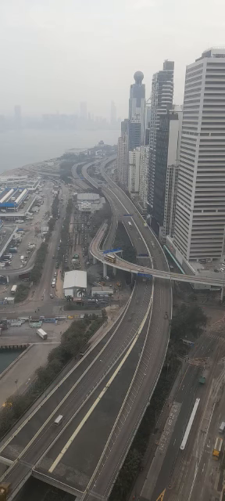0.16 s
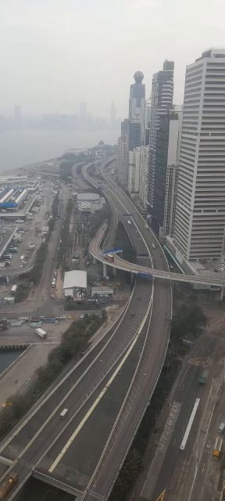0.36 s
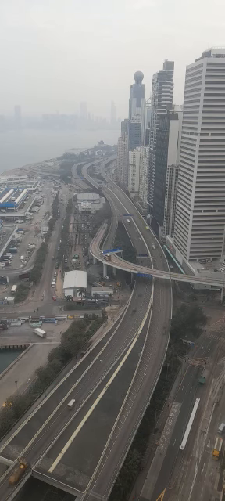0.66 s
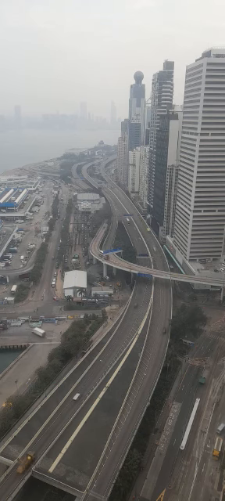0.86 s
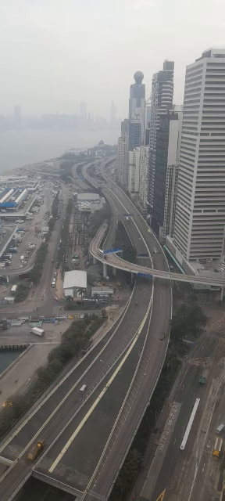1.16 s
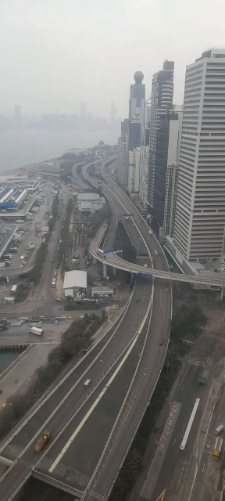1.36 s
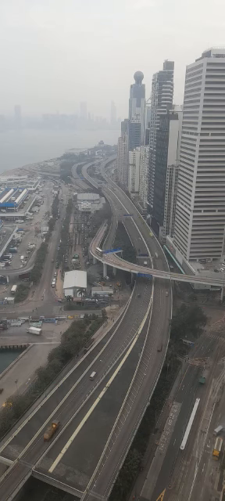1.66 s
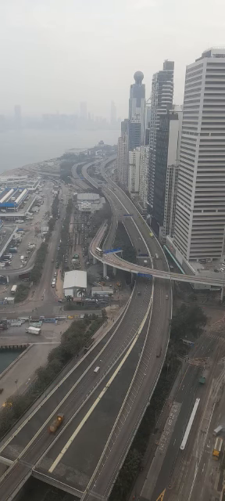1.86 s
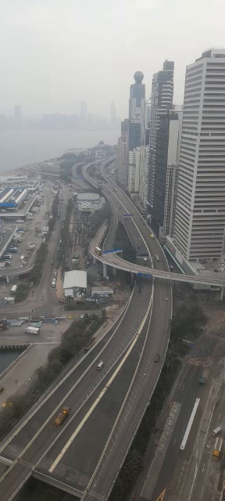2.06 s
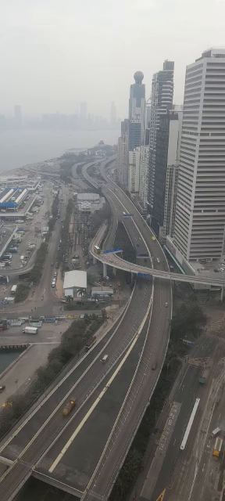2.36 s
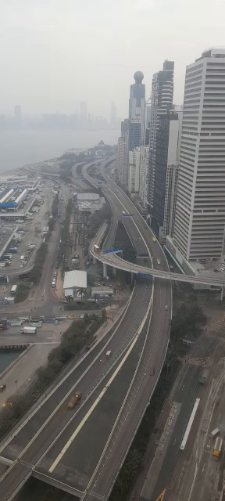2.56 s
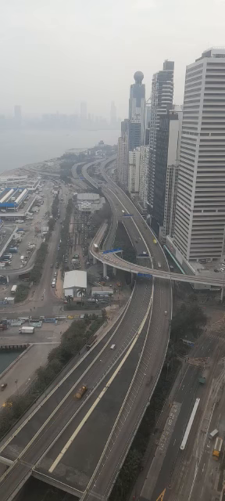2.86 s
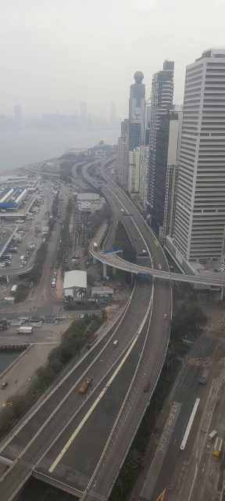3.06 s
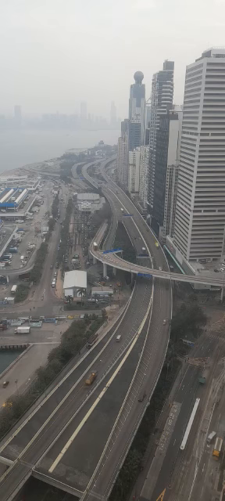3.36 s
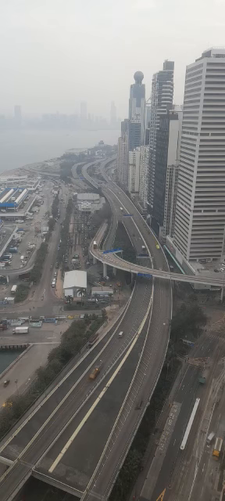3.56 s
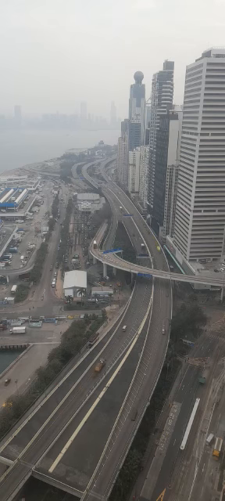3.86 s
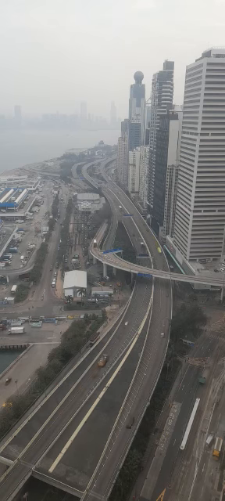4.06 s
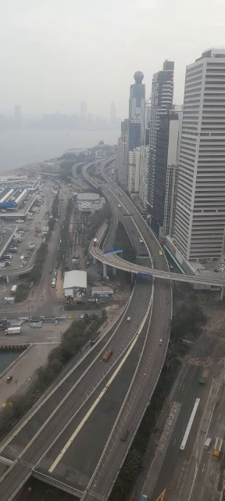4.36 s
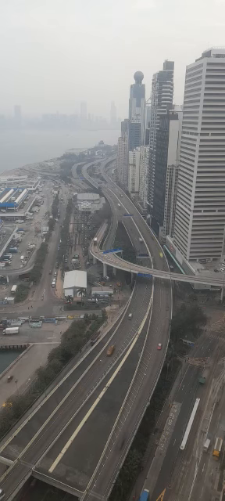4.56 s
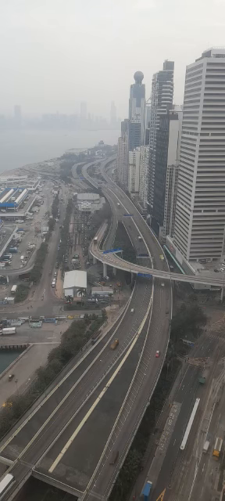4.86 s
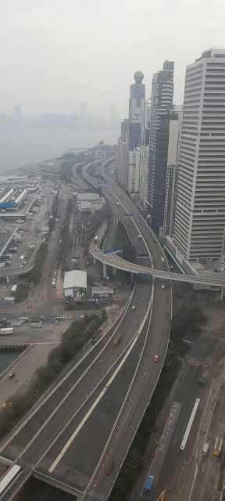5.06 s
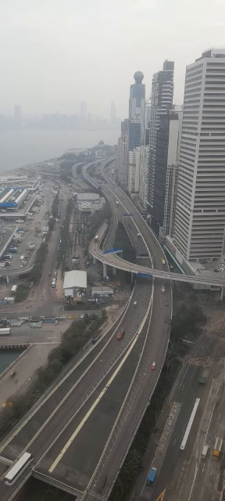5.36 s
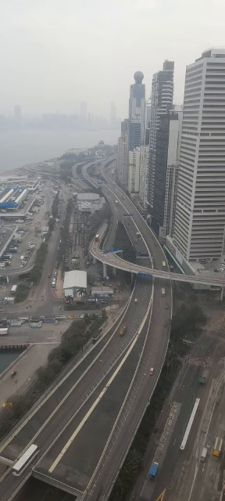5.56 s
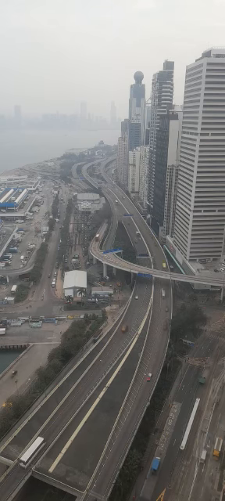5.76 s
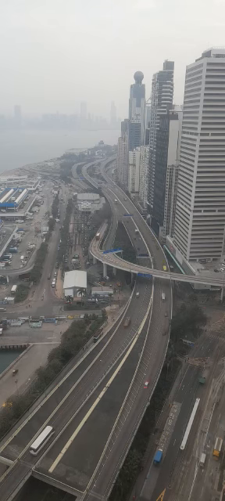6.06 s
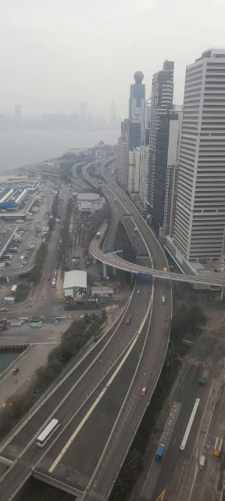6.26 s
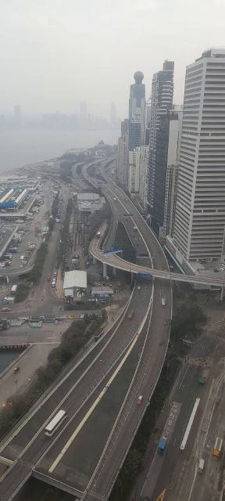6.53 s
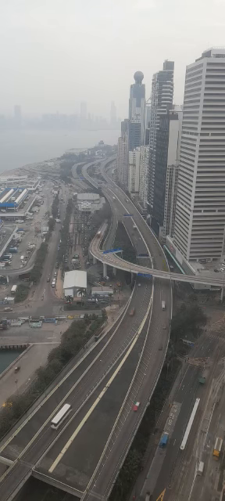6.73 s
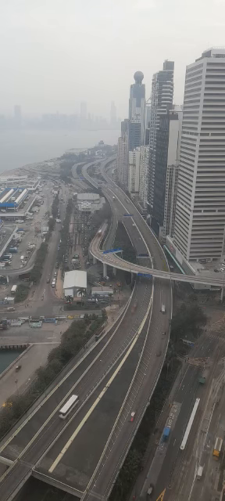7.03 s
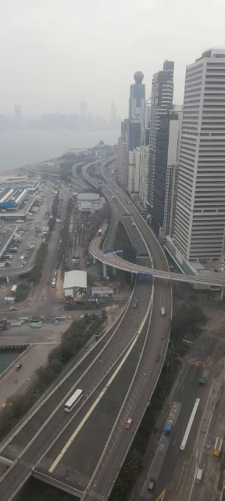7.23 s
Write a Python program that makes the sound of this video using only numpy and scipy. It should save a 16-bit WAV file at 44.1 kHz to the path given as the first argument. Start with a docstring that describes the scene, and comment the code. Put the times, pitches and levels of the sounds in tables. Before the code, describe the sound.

Heard from high in a tower, a low merged engine rumble and soft tyre roar rise from an elevated highway far below. Thin fluttering air hisses through a window gap close to the stereo microphones, slowly weakening. An engine revs briefly at the start, then a soft low bump and a faint brush. Tiny brake squeals and whines come and go; late on, a bus and lorries pull away with rising pitch.

```python
"""A low traffic rumble runs throughout, with a soft tyre roar, heard high up in a tower far above an elevated highway.
Close to the microphones air hisses thinly through a window gap: noise in narrow, fluttering resonances.
Engines are wavering tones with an octave above; late on, heavy vehicles pull away with rising pitch.
Faint whines and brake squeals are narrow wavering tones; a soft low bump, a faint brush and
the brighter hiss of single passing vehicles are shaped bands of noise."""
import sys
import numpy as np
from scipy import signal
from scipy.fft import rfft, irfft, next_fast_len
from scipy.io import wavfile

SR = 44100
rng = np.random.default_rng(int(sys.argv[2]) if len(sys.argv) > 2 else 0)


def store_wav(level_fs):
    """Save 16-bit WAV to argv[1]."""
    pcm = np.round(np.clip(np.atleast_2d(level_fs), -1, 1) * 32767)
    wavfile.write(sys.argv[1], SR, pcm.T.astype(np.int16))


N = 325899
TIME = np.arange(N) / SR  # seconds
FFT_SIZE = next_fast_len(N, True)
FREQ = np.maximum(np.arange(FFT_SIZE // 2 + 1) * SR / FFT_SIZE, 1)  # Hz, kept above 0 for the logarithm


def from_db(db):
    """Decibels to gain."""
    return 10 ** (np.asarray(db) / 20)


def rms_one(x):
    """Scale to unit power."""
    return x / np.sqrt(np.mean(np.abs(x) ** 2))


def in_time(rows):
    """Each column of a curve at every sample; the end rows hold outside the curve."""
    seconds, *columns = np.transpose(rows)
    return [np.interp(TIME, seconds, column) for column in columns]


def at_hz(points, hz):
    """Read a spectrum on a log-frequency axis."""
    known_hz, values = np.transpose(points)
    return np.interp(np.log(hz), np.log(known_hz), values)


def swell(middle, length):
    """A smooth rise to 1 and fall back to 0; both times in seconds."""
    return np.cos(np.pi * np.clip((TIME - middle) / length, -.5, .5))


def drift(rate):
    """Smooth chance of spread 1 that changes about rate times a second."""
    step = 40  # samples between slow values
    pole = np.exp(-2 * np.pi * rate * step / SR)
    chance = rng.standard_normal(N // step + 2002)
    slow = signal.lfilter([1], [1, -2 * pole, pole * pole], chance)[2000:]  # skip the filter's start
    return np.interp(np.arange(N) / step, np.arange(len(slow)), rms_one(slow))


# Balance between the two microphones. Each row: frequency in Hz, left minus right in dB.
EAR_BALANCE = [(60, -5), (105, 0), (225, -1), (300, -5), (400, -5), (700, -3.5), (1300, -2), (2600, -1.5),
               (3500, 1.5), (5600, -3), (7000, -1), (8000, 1), (13000, 0.5)]


def panned(hz):
    """Left and right gains for sound of this pitch."""
    return from_db(np.array([[.5], [-.5]]) * at_hz(EAR_BALANCE, hz))


# Open air at the two microphones. Each row: frequency in Hz, left-right correlation from -1 to 1.
EAR_LIKENESS = [(30, 0.99), (80, 0.94), (300, 1), (420, 0.74), (580, 0.62), (750, -0.013), (1300, -0.26),
                (2150, -0.11), (2800, 0.011)]


def stereo_noise(gain):
    """Noise of a given colour, alike at both microphones in the bass and unrelated in the high treble; rms 1."""
    mid, side = rfft(rng.standard_normal((2, FFT_SIZE)))
    alike = np.clip(at_hz(EAR_LIKENESS, FREQ), -.999, .999)
    pair = np.sqrt(1 + alike) * mid + np.sqrt(1 - alike) * side * [[1], [-1]]
    return rms_one(irfft(pair * gain * panned(FREQ))[:, :N])


def coloured(spectrum):
    """Stereo noise with a tabled spectrum."""
    return stereo_noise(from_db(at_hz(spectrum, FREQ)))


def band_gain(low_hz, high_hz):
    """Gain of a band-pass with third-order slopes."""
    return 1 / np.sqrt((1 + (low_hz / FREQ) ** 6) * (1 + (FREQ / high_hz) ** 6))


def from_road(sound):
    """Sound straight from the road reaches the left microphone first."""
    lead_s = .00043
    delay = np.exp(-2j * np.pi * FREQ * lead_s * np.array([[0], [1]]))
    return irfft(rfft(sound, FFT_SIZE) * delay * panned(FREQ))[:, :N]


def fading(width_hz):
    """Sound that arrives by many shifting paths wanders in strength and phase."""
    return rms_one(drift(width_hz) + 1j * drift(width_hz))


def wavering(scatter, width_hz):
    """A direct wave plus shifting echoes from the towers; the deepest fades are filled in."""
    wave = 1 + scatter * fading(width_hz)
    return rms_one(wave / np.sqrt(np.abs(wave) + 1e-3))


# How busy the highway below is. Each row: time in seconds, tyre roar in dB before a fixed lift and a drift.
ROAD_BUSYNESS = [(0, -58), (2.3, -58.5), (2.85, -60), (3.7, -57.5), (5.6, -57), (5.9, -56), (6.6, -54.5),
                 (7.39, -57.3)]


def busyness_db():
    """The slow swing of the traffic, shared by the tyres and the engine rumble."""
    roar_db, = in_time(ROAD_BUSYNESS)
    return roar_db


# Many far engines merged. Each row: frequency in Hz, relative level in dB per Hz.
RUMBLE_SPECTRUM = [(12, -48), (27, -20), (35, -29), (49, -15.5), (61, 1), (70, -4), (92, -2.5), (105, 3),
                   (122, 2), (135, -4), (178, -11), (194, -7), (250, -12), (320, -15.5), (370, -22),
                   (1500, -64.5)]


def engine_rumble(roar_db):
    """Far engines merge into low noise that follows the roar by a share of its swing."""
    mean_db, follows = -39, 0.31
    level_db = mean_db + follows * (roar_db - roar_db.mean()) + 1.2 * drift(6.0)
    return from_db(level_db) * coloured(RUMBLE_SPECTRUM)


# Far tyres on the road. Each row: frequency in Hz, relative level in dB per Hz.
TYRE_SPECTRUM = [(100, -29), (380, 0.5), (490, -3.5), (620, -0.2), (780, -5), (1000, -8.3), (1400, -13),
                 (1850, -14.5), (2350, -18), (2700, -20), (3200, -24), (4500, -23.5), (7000, -30),
                 (8200, -58)]


def tyre_roar(roar_db, direct_db=-10.5, direct_above_hz=860):
    """Tyre noise comes from all over the city; some of its upper part arrives straight from the highway."""
    gain = from_db(at_hz(TYRE_SPECTRUM, FREQ))
    scattered = stereo_noise(gain)
    upper = gain / np.sqrt(1 + (direct_above_hz / FREQ) ** 8)
    direct = rms_one(from_road(irfft(rfft(rng.standard_normal(FFT_SIZE)) * upper)))
    roar = rms_one(scattered + from_db(direct_db) * direct)
    return from_db(roar_db + 3.5 + 0.5 * drift(4.3)) * roar


def window_gap(modes, level_db, flutter_db, flutter_rate):
    """Turbulent air sounds each resonance of the gap with a strength that flutters."""
    air = 0
    for hz, width_hz, mode_db in modes:
        resonance = 1 / (1 + ((FREQ - hz) / (.75 * width_hz)) ** 2)
        strength = np.sqrt(width_hz) * from_db(mode_db + flutter_db * drift(flutter_rate))
        air = air + strength * stereo_noise(resonance)
    return from_db(level_db) * rms_one(air)


def nearby_walls(sound, t60, wet):
    """Dense short reflections, different at each microphone, split a hiss into fine lines."""
    age = TIME[:SR // 4]
    echoes = rng.standard_normal((2, len(age))) * from_db(-60 * age / t60)
    echoes /= np.sqrt(np.sum(echoes ** 2, axis=1, keepdims=True))
    both = sound.sum(axis=0, keepdims=True)
    reflected = signal.fftconvolve(both, echoes, axes=1)[:, :N]
    return np.sqrt(1 - wet) * sound + np.sqrt(wet / 2) * reflected


# Resonances of the gap, close by. Each row: frequency in Hz, nominal width in Hz, relative level in dB.
LOWER_GAP_MODES = [(4278, 240, 0), (4490, 160, -2), (5090, 190, -2.5), (5473, 250, -1.5)]
UPPER_GAP_MODES = [(5530, 124, -3), (6000, 75, -2.5), (6230, 500, -9.5), (6690, 106, 0), (6810, 140, 0.5),
                   (7360, 230, -4), (8630, 145, -13), (9450, 160, -18.5), (10930, 150, -20)]
# Gusts through the gap. Each row: middle in seconds, length in seconds,
# lift of the lower resonances in dB, lift of the upper resonances in dB.
GAP_GUSTS = [(.04, 0.21, 0.5, 2.5), (1.331, 0.44, -3, 3.5), (1.767, 0.36, 3.5, 2.5), (2.196, .18, 2, 4.5),
             (3.49, 0.13, 1.5, 2), (3.72, .12, -1.5, 4.5), (6.772, 0.36, 4.5, 0)]


def draught():
    """Air through the window gap slackens, its upper resonances fastest; gusts briefly shift both levels."""
    low_db = -63.5 - 0.16 * TIME  # start in dB, fade in dB per second
    high_db = -61 - 1.24 * TIME
    for middle, length, low_lift_db, high_lift_db in GAP_GUSTS:
        gust = swell(middle, length)
        low_db = low_db + low_lift_db * gust
        high_db = high_db + high_lift_db * gust
    lower = window_gap(LOWER_GAP_MODES, low_db, flutter_db=1.67, flutter_rate=4.1)
    upper = window_gap(UPPER_GAP_MODES, high_db, flutter_db=2.3, flutter_rate=4.1)
    return nearby_walls(lower + upper, t60=.2, wet=0.44)


def engine(hz, level_db, scatter, width_hz, overtone_db, lead=0.12):
    """A firing tone and its octave; lead is the phase between the ears in radians."""
    phase = 2 * np.pi * (np.cumsum(hz * np.ones(N)) / SR + rng.random())
    firing = wavering(scatter, width_hz) * np.exp(1j * phase)
    octave = from_db(overtone_db) * fading(width_hz) * np.exp(2j * phase)
    ears = np.exp(.5j * lead * np.array([[1], [-1]])) * panned(np.median(hz))
    return np.sqrt(2) * from_db(level_db) * np.real((firing + octave) * ears)


# The idling engine carried up by the air. Each row: middle in seconds, length in seconds, lift in dB.
IDLE_LIFTS = [(.8, .7, 5), (3.42, .55, 7), (4.173, .4, 9.5), (5.66, 0.42, 9), (6.35, 0.51, 4)]


def idling_diesel():
    """An idling diesel holds its pitch and swells as the air carries it up."""
    level_db = -46.5 + sum(lift_db * swell(middle, length) for middle, length, lift_db in IDLE_LIFTS)
    return engine(78.94, level_db, scatter=0.98, width_hz=4.6, overtone_db=-14.0, lead=0.076)


# A far engine heard throughout. Each row: time in seconds, pitch in Hz, level in dB.
DRONE_CURVE = [(0, 289, -50), (1.35, 284, -51.5), (1.75, 288, -45.5), (3.2, 288, -50.5), (3.9, 290, -46),
               (5.3, 291, -50.5), (6.0, 284, -48.5), (7.39, 286, -55)]


def steady_drone():
    """A far engine wavers strongly around a nearly even pitch."""
    return engine(*in_time(DRONE_CURVE), scatter=2.0, width_hz=9.0, overtone_db=-24, lead=-.2)


def narrow_tone(middle, length, hz, width_hz, level_db):
    """A wavering tone that swells to its level and fades."""
    tone = np.real(wavering(2.9, width_hz / 2) * np.exp(2j * np.pi * hz * TIME))
    return np.sqrt(2) * from_db(level_db) * swell(middle, length) * tone


# Lasting whines from the road far below. Each row: middle in seconds, length in seconds,
# pitch in Hz, nominal width in Hz, peak level in dB.
ROAD_WHINES = [(1.5, 1.8, 1700, 18, -73), (.5, 1.5, 1815, 60, -71), (4.9, 6.3, 1855, 44, -75.5),
               (5.0, 9.2, 1772, 37, -72), (1.6, 16, 2105, 35, -74.5), (2.7, 19, 2295, 48, -77.5),
               (5.2, 6.6, 2440, 51, -75.5)]


def whines():
    """Lasting whines from the road, each a tone blurred by its wavering."""
    return from_road(sum(narrow_tone(*row) for row in ROAD_WHINES))


# Brakes on the road far below. Each row: middle in seconds, length in seconds, pitch in Hz, peak level in dB.
BRAKE_SQUEALS = [(0.153, 0.22, 2290, -65.5), (0.682, 0.27, 2447, -68.5), (1.27, 0.28, 2460, -70),
                 (4.37, .32, 2276, -68), (4.68, .18, 3130, -68), (5.02, 0.22, 3150, -67),
                 (5.853, .2, 3150, -75), (6.13, .2, 3160, -67), (7.13, .25, 1845, -67)]


def brake_squeals():
    """Short brake squeals from the road, narrow tones of one shared width."""
    squeals = 0
    for middle, length, hz, level_db in BRAKE_SQUEALS:
        squeals = squeals + narrow_tone(middle, length, hz, width_hz=21, level_db=level_db)
    return from_road(squeals)


def brief_rev():
    """One engine revs briefly: a held tone that swells and falls."""
    tone = engine(195, -40, scatter=0.6, width_hz=2.9, overtone_db=-30)
    return swell(middle=.34, length=0.16) * tone


def puff(start, rise, t60, low_hz, high_hz, level_db):
    """A short burst of noise in one band that rises and dies away; times in seconds."""
    age = np.maximum(TIME - start, 0)
    envelope = np.minimum(age / rise, 1) * from_db(level_db - 60 * age / t60)
    return envelope * stereo_noise(band_gain(low_hz, high_hz))


def low_bump():
    """A soft bump: deep noise that dies away within about a second."""
    return puff(start=0.77, rise=.03, t60=0.99, low_hz=34, high_hz=62, level_db=-40)


def faint_brush():
    """A faint brush: a quick puff of treble noise."""
    return puff(start=2.571, rise=.003, t60=.3, low_hz=1500, high_hz=5500, level_db=-59)


# Single vehicles on the highway. Each row: middle in seconds, length in seconds, peak level in dB.
VEHICLE_PASSES = [(3.48, .35, -65), (3.93, .5, -62), (4.3, .35, -66), (6.55, 0.8, -67.5)]


def passes():
    """The brighter tyre hiss of single vehicles comes and goes."""
    strength = sum(from_db(level_db) * swell(middle, length) for middle, length, level_db in VEHICLE_PASSES)
    return strength * stereo_noise(band_gain(low_hz=800, high_hz=2250))


# A bus far below. Each row: time in seconds, pitch in Hz, level in dB.
BUS_CURVE = [(5.3, 77, -65), (5.7, 79.67, -46), (6.33, 87.05, -37), (6.6, 95, -39.5), (7.1, 107.4, -38.5),
             (7.39, 110.9, -43)]


def bus():
    """A bus pulls away: its low firing tone climbs."""
    return engine(*in_time(BUS_CURVE), scatter=1.1, width_hz=3.4, overtone_db=-16, lead=0.22)


# A lorry far below. Each row: time in seconds, pitch in Hz, level in dB.
LORRY_CURVE = [(5.55, 302, -64), (5.85, 315.3, -50), (6.2, 340, -50), (6.45, 314.5, -53.5),
               (6.75, 322.6, -46), (7.05, 329, -48), (7.39, 348, -56)]


def lorry():
    """A lorry pulls away: its pitch climbs, drops back and climbs again."""
    return engine(*in_time(LORRY_CURVE), scatter=1.6, width_hz=9.0, overtone_db=-22, lead=.4)


# A lorry farther off. Each row: time in seconds, pitch in Hz, level in dB.
FAR_LORRY_CURVE = [(5.7, 224, -64.5), (6.1, 226, -52), (7.39, 237, -49)]


def far_lorry():
    """A farther lorry's firing tone rises slowly."""
    return engine(*in_time(FAR_LORRY_CURVE), scatter=1.0, width_hz=4.0, overtone_db=-23.0)


def scene():
    """Far traffic, the near draught, a soft low bump and a faint brush."""
    roar_db = busyness_db()
    traffic = engine_rumble(roar_db) + tyre_roar(roar_db) + passes()
    engines = idling_diesel() + steady_drone() + brief_rev() + bus() + lorry() + far_lorry()
    squeaks = whines() + brake_squeals()
    return traffic + draught() + engines + squeaks + low_bump() + faint_brush()


# The microphones' own hiss. Each row: frequency in Hz, relative level in dB per Hz.
HISS_SPECTRUM = [(1000, 0), (7000, -1), (8200, -5), (10000, -2), (11300, 0), (14000, 0), (16000, -2)]


def record(dry):
    """The microphones add their own faint hiss; the top is cut steeply above 15650 Hz."""
    heard = dry + from_db(-70.5) * coloured(HISS_SPECTRUM)
    top_cut = signal.ellip(12, .1, 80, 15650, fs=SR, output="sos")
    return signal.sosfilt(top_cut, heard)


dry = scene()
out = record(dry)
store_wav(out)
```